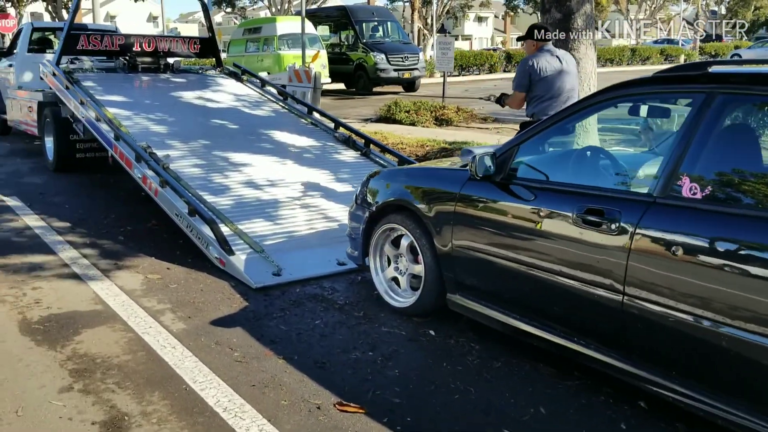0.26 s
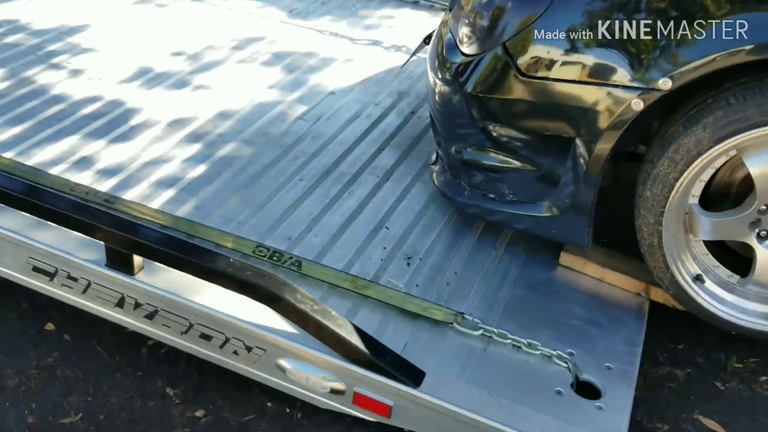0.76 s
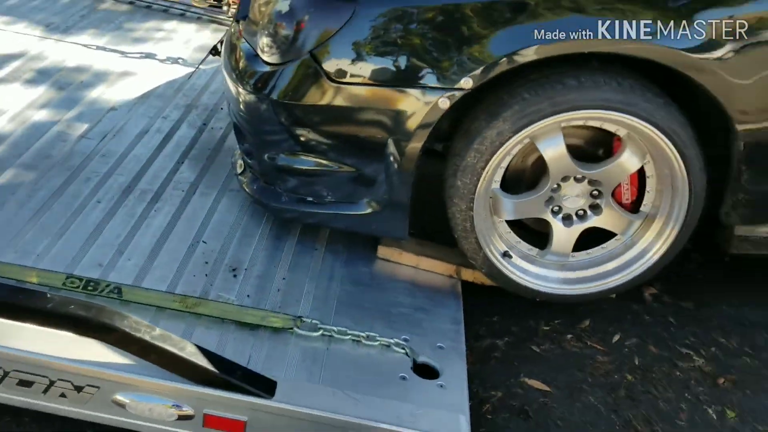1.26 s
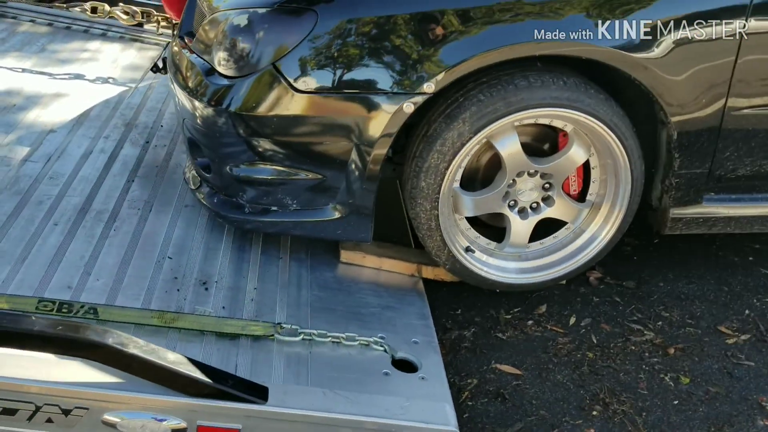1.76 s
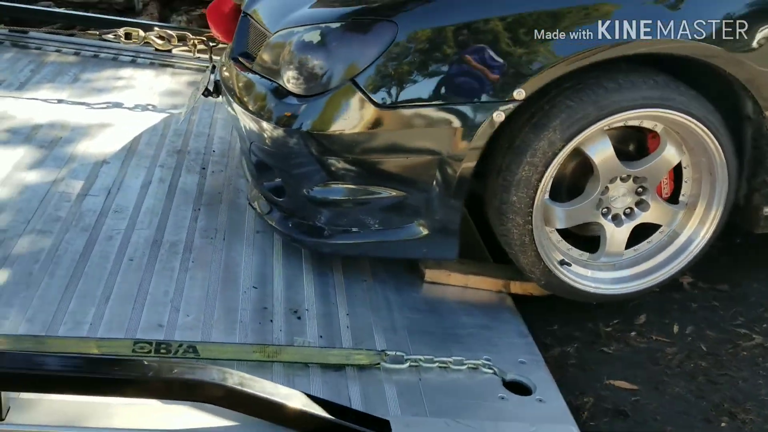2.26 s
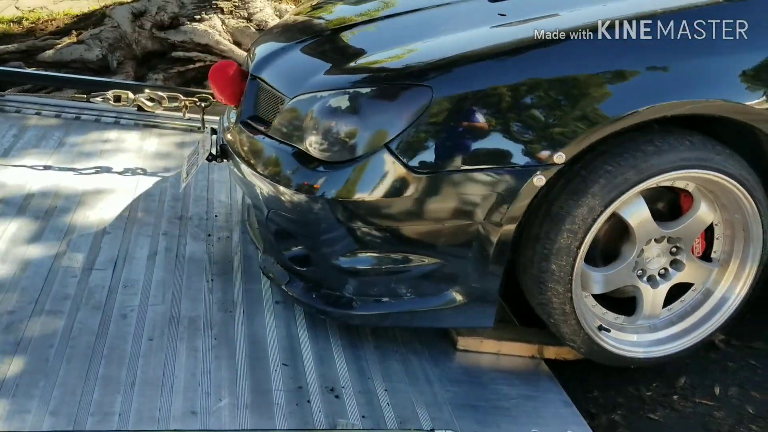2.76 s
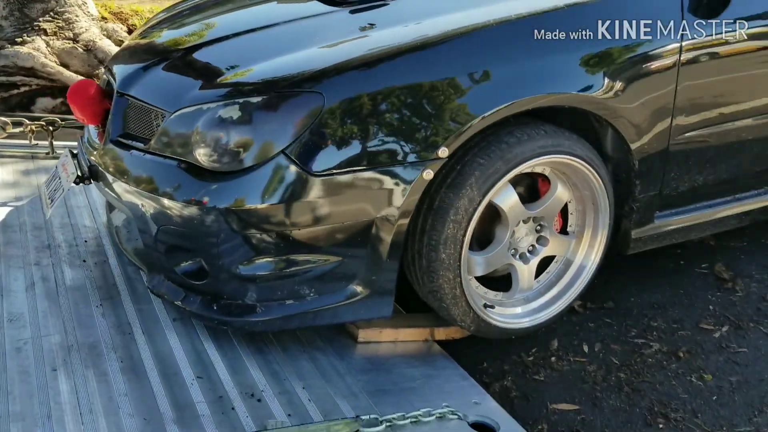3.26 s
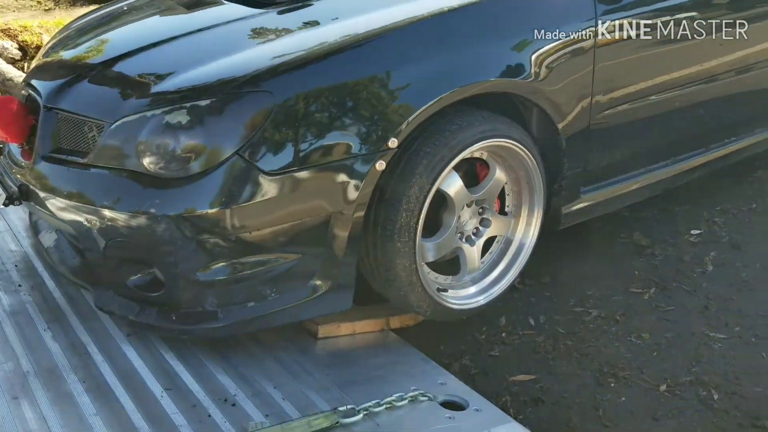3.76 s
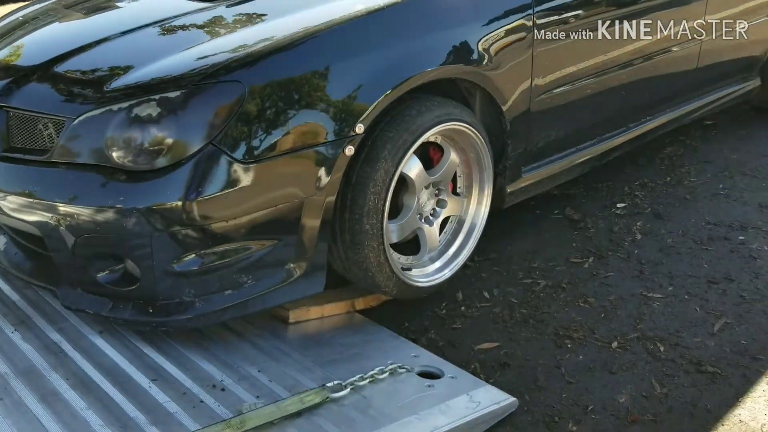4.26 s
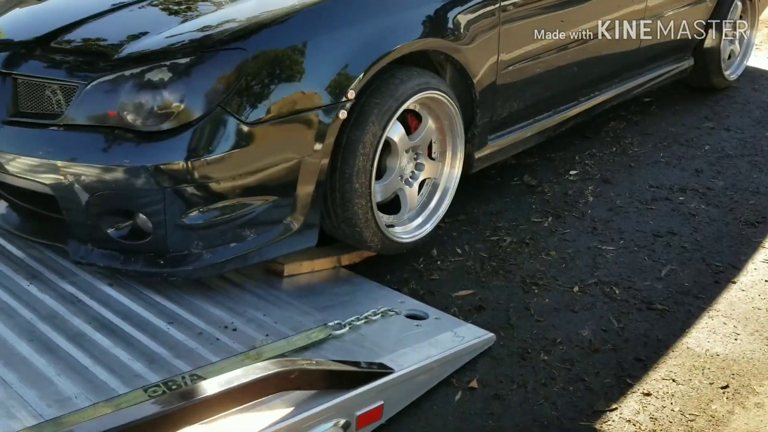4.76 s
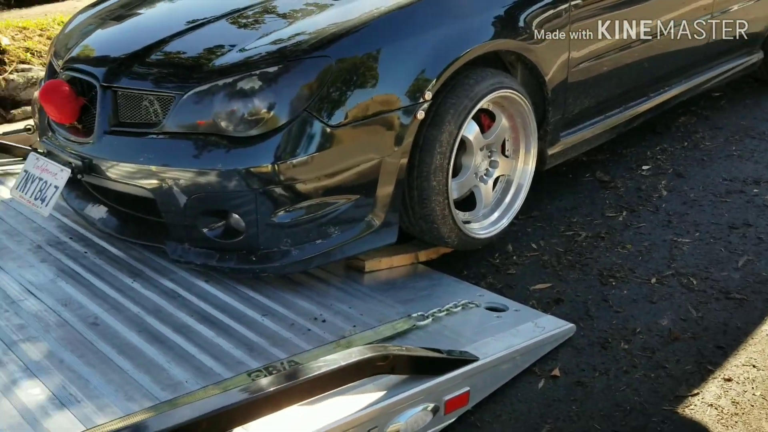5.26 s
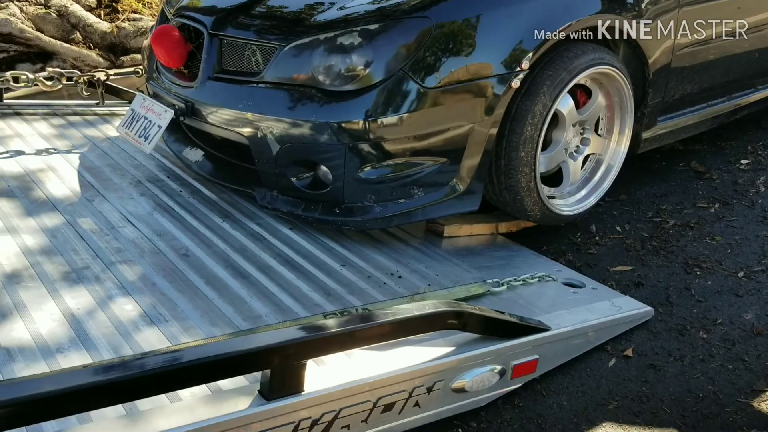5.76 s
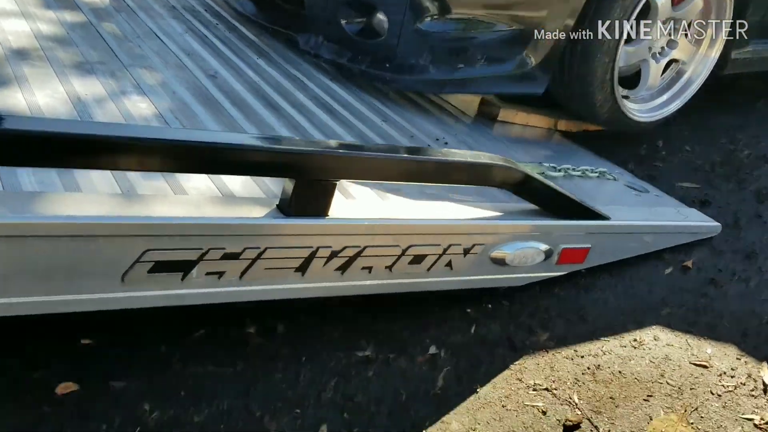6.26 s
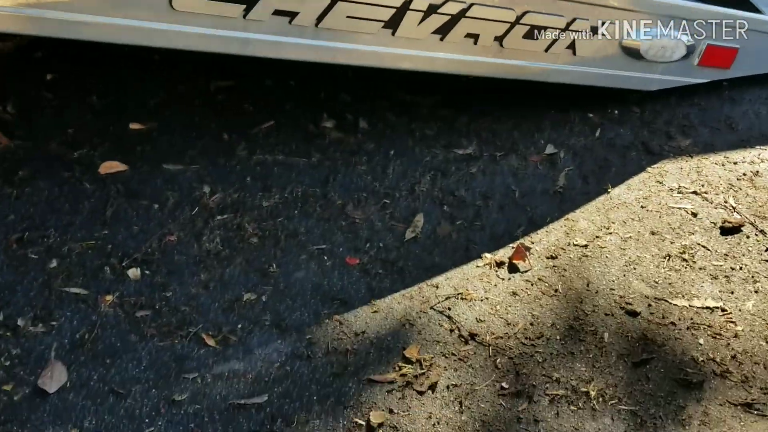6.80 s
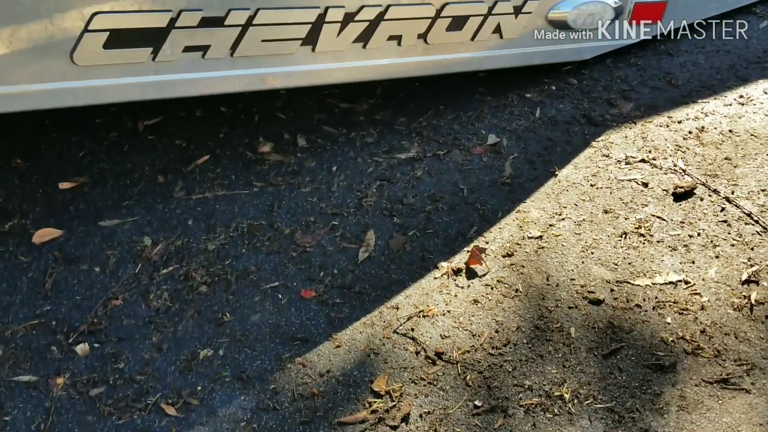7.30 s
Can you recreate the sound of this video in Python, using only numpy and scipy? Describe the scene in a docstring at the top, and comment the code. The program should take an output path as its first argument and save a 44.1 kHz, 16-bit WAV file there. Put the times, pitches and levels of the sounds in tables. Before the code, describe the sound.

A tow truck's diesel idles under a steady winch hum that swells and sinks, with light shoe scuffs and snapping dry leaves.

```python
"""A tow truck rumbles far away, with a scrape of shoes and snapping leaves, and is cut off after 0.57 s.
Then it fades in close by: its diesel runs at fast idle and drives the oil pump of the winch, whose pulses
ring in the steel bed as a whine. The whine swells and sinks as the listener walks round the bed.
Shoes scuff, grit and dry leaves snap. Oil hisses through a valve, loudest from 1.7 to 3.3 s.
Keys chink near 4.5 s and again near 6.2 s."""
import sys
import numpy as np
from scipy import signal
from scipy.fft import rfft, irfft, next_fast_len
from scipy.io import wavfile
from scipy.ndimage import uniform_filter1d, map_coordinates

SR = 44100
rng = np.random.default_rng(int(sys.argv[2]) if len(sys.argv) > 2 else 0)


def digitize_waveform(pressure):
    """Quantize a signal to 16-bit integers and store it at the path in sys.argv[1].

    Rows of a 2-D input are taken as channels; values are limited to [-1, 1].
    """
    field = np.atleast_2d(pressure).T
    bounded = np.clip(field, -1, 1)
    quanta = np.round(bounded * 32767).astype(np.int16)
    wavfile.write(sys.argv[1], SR, quanta)


N = 332205
T = np.arange(N) / SR
FAR_END_S = 0.6  # the far scene gives way to the near one
HISS_SWAY_DB = 0.6

# How the listener turns: (time [s], right ear's delay [ms], whine's left over right [dB])
FACING = [(0, 0.44, 1.5), (1, 0.495, 1.5), (1.7, 0.472, 4), (2.2, 0.466, 2.5), (3.5, 0.412, 4.5),
          (4.5, 0.362, 8.5), (5.5, 0.41, 6), (6.1, 0.433, 6), (7.6, 0.43, 8.5)]


def amp(db):
    """Turn decibels into a gain."""
    return 10 ** (np.asarray(db) / 20)


def unit(x):
    """Scale a signal to an average (rms) strength of 1."""
    return x / np.sqrt(np.mean(x ** 2) + 1e-20)


def sides(db):
    """Left and right gains that make the left louder by db."""
    return amp([db / 2, -db / 2])


def along(points, hz):
    """Read between (frequency, value) points on a musical (log) scale."""
    freqs, values = np.transpose(points)
    return np.interp(np.log(hz + 1), np.log(freqs + 1), values)


def curves(rows):
    """Turn each column after the time into one value per sample."""
    times, *columns = np.transpose(rows)
    return [np.interp(T, times, column) for column in columns]


def wobble(rate):
    """A smooth random curve through rate points a second."""
    coarse = T[::64]
    points = rng.standard_normal(int(N * rate / SR) + 4)
    return np.interp(T, coarse, map_coordinates(points, [coarse * rate]))


def swell_db(start, end, rise_db_s, fall_db_s):
    """A level that climbs to 0 dB at start, holds, and drops after end."""
    return -rise_db_s * np.maximum(start - T, 0) - fall_db_s * np.maximum(T - end, 0)


def shape(spectrum):
    """A tone colour (gain by frequency) from (frequency, level) points."""
    return lambda hz: amp(along(spectrum, hz))


def hump(centre_hz, octaves):
    """A tone colour with one bell-shaped peak."""
    return lambda hz: np.exp(-.5 * (np.log2((hz + 1) / centre_hz) / octaves) ** 2)


def filtered(x, colour):
    """Give a signal a tone colour."""
    n = x.shape[-1]
    size = next_fast_len(n + 4096)
    return irfft(rfft(x, size) * colour(np.fft.rfftfreq(size, 1 / SR)), size)[..., :n]


def lean():
    """Left and right gains that drift the opposite way to the whine."""
    return sides(7 - 0.45 * curves(FACING)[1])


def add(out, start, sound, pan_db):
    """Lay a short sound into the two channels."""
    slot = out[:, round(start * SR):][:, :sound.shape[-1]]
    slot += sound[..., :slot.shape[1]] * sides(pan_db)[:, None]


def rush(colour, patchy_db, count=N, ringing_db=0):
    """Stereo noise, count samples long, with random loud patches and slowly drifting resonances."""
    # How alike the two ears hear it: (frequency [Hz], likeness [0 to 1])
    likeness = [(40, 0.64), (100, 0.8), (300, 1), (700, 0.51), (2000, 0.65), (5000, 0.29), (15000, 0.14)]
    # Which side each pitch favours: (frequency [Hz], left over right [dB])
    balance = [(60, -3), (250, 0.5), (1300, 2), (2400, -3.5), (4400, -5.5), (8000, -1), (15000, -5)]
    # Around 700 Hz the noise reaches the two ears more nearly in step:
    # (frequency [Hz], phase shift [radians])
    ear_phase_shift = [(300, -0.42), (700, -1), (1100, -0.43)]
    grid = signal.stft(rng.standard_normal((2, count)), nperseg=1024)[2]  # ear, frequency, time
    patches = uniform_filter1d(rng.standard_normal(grid.shape[1:]), size=4, axis=0)
    patches = uniform_filter1d(patches, size=10, axis=1)
    resonances = uniform_filter1d(rng.standard_normal(grid.shape[1:]), size=90, axis=1)
    grid *= amp(patchy_db * unit(patches) + ringing_db * unit(resonances))
    pair = signal.istft(grid, nperseg=1024)[1][:, :count]
    size = next_fast_len(count)
    hz = np.fft.rfftfreq(size, 1 / SR)
    spread = np.arccos(np.clip(along(likeness, hz), -1, 1)) / 2
    mid, side = rfft(pair, size) * colour(hz) * [np.cos(spread), np.sin(spread)]
    shift = np.exp(.5j * np.outer([1, -1], along(ear_phase_shift, hz)))
    both = irfft([mid + side, mid - side] * sides(along(balance, hz)) * shift, size)[:, :count]
    return np.pad(unit(both), ((0, 0), (0, N - count))) * lean()


def burst(colour, decay_s, tick=0):
    """A puff of noise that falls 60 dB in decay_s, partly alike in both ears; tick adds a click."""
    t = np.arange(SR // 16) / SR
    envelope = amp(-60 * t / max(decay_s, .002)) * (1 - np.exp(-t / 0.00024))
    puff = envelope * filtered(rng.standard_normal((2, len(t))), colour)
    puff *= np.sqrt(np.sum(envelope ** 2) / np.sum(puff ** 2, axis=1, keepdims=True))
    puff[1] = 0.24 * puff[0] + 1.15 * puff[1]
    click = filtered(signal.unit_impulse(len(t), idx=SR // 1500), colour)
    return puff + tick * click / click.max()


def faint_tones():
    """Thin, unsteady tones come and go."""
    # (start [s], end [s], first pitch [Hz], last pitch [Hz], level [dB])
    tones = [(3.02, 3.35, 326, 322, -45), (3.5, 5.9, 590, 580, -53), (6.5, 7.6, 655, 653, -53),
             (6.5, 7.6, 690, 685, -54), (5.4, 5.95, 118, 148, -41), (3.6, 4.9, 413, 409, -55),
             (3.2, 7.6, 312, 304, -57), (2.8, 4.3, 2545, 2541, -57), (.8, 7.6, 6774, 6774, -76),
             (1.8, 3.4, 1165, 1165, -59), (1.9, 3.7, 2050, 2058, -61), (.3, .44, 828, 828, -43)]
    out = np.zeros(N)
    for start, end, first_hz, last_hz, db in tones:
        on = (T > start) & (T < end)
        fade = np.clip(np.minimum(T[on] - start, end - T[on]) / 0.045, 0, 1)
        hz = np.interp(T[on], (start, end), (first_hz, last_hz))
        phase = 2 * np.pi * np.cumsum(hz) / SR + 0.041 * np.sqrt(first_hz) * wobble(18)[on]
        out[on] += amp(db + 1.2 * wobble(11)[on]) * fade * np.sin(phase)
    return np.sqrt(2) * out * lean()


def far_engine():
    """From far off the engine is only a rumble that swells once and an even rush."""
    # Colour of the far rumble: (frequency [Hz], level [dB])
    rumble_colour = [(12, -67), (20, -40), (32, -29), (49, 2.5), (81, -2), (176, 0), (384, -11), (550, -22),
                     (720, -59), (1210, -120)]
    # Colour of the rush above it: (frequency [Hz], level [dB])
    rush_colour = [(240, -39), (400, -27), (528, -19), (645, -20), (826, -25), (1110, -10), (1250, -13),
                   (1390, -4.5), (1560, -15), (2300, -16), (2680, -14), (3070, -16), (7510, -33),
                   (9920, -34), (16000, -39)]
    rumble_db = -31.5 + swell_db(0.35, 0.35, rise_db_s=23, fall_db_s=27) + 0.72 * wobble(59.2)
    rumble = amp(rumble_db) * rush(shape(rumble_colour), patchy_db=1.9, count=SR)
    return rumble + amp(-44) * rush(shape(rush_colour), patchy_db=2.5, count=SR)


def shoes():
    """Soles make one hollow scrape, crack grit and drag over the ground."""
    # Colour of the scrape: (frequency [Hz], level [dB])
    scrape_colour = [(520, -38), (630, -1.5), (700, 0), (750, -5), (830, 1), (950, -5.5), (1080, -33.5)]
    # Grit cracking under a sole: (time [s], level [dB], pitch [Hz])
    cracks = [(1.468, -42, 684), (1.485, -33, 773), (1.524, -44, 900), (1.553, -45, 750), (1.584, -39, 845),
              (1.604, -41, 696), (1.638, -48, 700), (1.649, -32, 700), (3.63, -33, 700.2),
              (3.656, -39, 900), (3.681, -33, 497), (4.5685, -20.5, 2050), (4.832, -33, 885),
              (6.091, -40, 1420), (6.1227, -40, 2660), (6.247, -35, 2700), (6.262, -30.5, 1800)]
    # Scuffs, rustles and thuds: (time [s], length [s], level [dB], pitch [Hz], width [octaves])
    scuffs = [(1.464, .22, -38, 605, 0.77), (3.598, 0.11, -39, 880, 1.37), (3.623, 0.04, -47, 4260, 0.17),
              (4.511, 0.14, -41.5, 1460, 1.58), (4.564, 0.1, -40.5, 790, 0.91),
              (4.771, 0.025, -38, 1100, 0.92), (4.811, 0.037, -35.5, 700, 1.24),
              (4.812, 0.12, -39, 1280, 0.98), (5.807, 0.055, -41.5, 1390, 0.6),
              (6.051, 0.23, -43.5, 1890, 1.22), (6.123, 0.095, -42, 13200, 0.25),
              (6.215, 0.13, -45.5, 13600, 0.59), (6.985, 0.061, -33, 107, 0.18),
              (7.028, 0.05, -34, 60, 0.38), (7.076, 0.11, -49.5, 9000, 1.3), (0.544, 0.034, -32, 129, 1.05)]
    scrape_db = -39 + swell_db(0.13, 0.36, rise_db_s=88, fall_db_s=61) + 0.59 * wobble(61.6)
    out = amp(scrape_db) * rush(shape(scrape_colour), patchy_db=4, count=SR) * (T < FAR_END_S)
    for start, db, hz in cracks:
        add(out, start, amp(db) * burst(hump(hz, octaves=.6), decay_s=15 / hz, tick=2.2), pan_db=4)
    for start, length, db, hz, octaves in scuffs:
        n = round(length * SR)
        grit = rng.standard_normal((2, n))
        grit *= amp(2.5 * unit(uniform_filter1d(rng.standard_normal(n), size=130)))  # grainy loudness
        grit[1] = 0.43 * grit[0] + 0.63 * grit[1]
        scuff = np.hanning(n) ** 0.48 * unit(filtered(grit, hump(hz, octaves)))
        add(out, start, amp(db) * scuff, pan_db=3)
    return out


def leaves():
    """Dry leaves snap close by, each a click and a puff in three pitch bands."""
    # (time [s], low band [dB], middle band [dB], high band [dB], decay [s], left over right [dB])
    snaps = [(0.345, -31, -37.5, -46, 0.013, 8.5), (0.3502, -43, -38, -40, 0.01, 9),
             (0.409, -38, -21.5, -25.5, 0.0065, 9.5), (0.4122, -35, -46, -34.5, 0.018, 14),
             (0.4224, -50, -42, -52, 0.013, 6), (1.524, -41, -41, -35.5, .014, 2),
             (1.793, -46, -35, -29, 0.024, 3), (1.881, -45, -28.5, -28.5, 0.012, 3),
             (2.041, -34, -33, -31.5, 0.025, 4), (3.633, -36.5, -48, -46, 0.027, 14),
             (3.68, -45, -46, -40, .012, 6), (3.7454, -59, -52, -36, .014, -1),
             (4.402, -35, -35, -31.5, 0.018, 4), (4.4187, -55, -37, -34, 0.016, 2),
             (4.4495, -50, -46, -35, .008, 3), (4.5225, -30, -35, -53, 0.02, 3),
             (4.5347, -25.5, -41, -46, 0.0097, 11), (4.544, -31, -40.5, -47, 0.023, 19),
             (4.5512, -28, -42, -43, 0.022, 8), (4.568, -39, -37, -36, 0.017, 15),
             (4.576, -33, -45, -40, .022, 12), (4.833, -37, -46, -48, 0.025, 11),
             (6.1328, -33, -41, -32, 0.031, 5), (6.1517, -44, -39, -31, 0.029, 1),
             (6.263, -33, -46, -44, 0.014, 3), (6.4617, -33.5, -38, -31.5, 0.017, 6)]
    # The low, middle and high band: (centre [Hz], width [octaves])
    bands = [(2300, 0.51), (5300, 0.54), (12460, 0.3)]
    out = np.zeros((2, N))
    for start, *levels, decay_s, pan_db in snaps:
        snap = sum(amp(db) * burst(hump(*band), decay_s, tick=1) for db, band in zip(levels, bands))
        add(out, start, snap, pan_db)
    return out


def keys():
    """Keys meet with a crack, then ring in two clusters of notes so close they sound like noise."""
    # (time [s], low ring [dB], low ring's pitch [Hz], high ring [dB], left over right [dB])
    chinks = [(4.406, -41, 11800, -40, 4), (4.5999, -39.5, 10870, -41, 11), (4.6083, -49, 10800, -48, 0),
              (4.6763, -49, 11730, -41, 7), (6.231, -29.5, 11650, -28, 3), (6.2427, -38, 11830, -32, 2.5),
              (6.2497, -37, 11700, -32, 3), (6.2696, -35, 11700, -36, 4), (6.2874, -50, 11900, -45, -5),
              (6.302, -43, 11800, -41, -3)]
    # The low and the high ring: (decay [s], width [Hz])
    rings = [(0.061, 110), (.04, 500)]
    high_hz = 14900
    out = np.zeros((2, N))
    for start, low_db, low_hz, high_db, pan_db in chinks:
        for hz, db, (decay_s, width_hz) in zip((low_hz, high_hz), (low_db, high_db), rings):
            add(out, start, amp(db) * burst(hump(hz, width_hz / hz), decay_s), pan_db)
        crack = amp(low_db + 4) * burst(hump(12000, octaves=0.29), decay_s=0.017)
        add(out, start, crack, pan_db)
    return out


def exhaust():
    """The diesel's firings make a low hum and its octave, which waver as no two firings are alike."""
    # Loudness of the hum: (time [s], level [dB])
    hum_levels = [(0.9, -44.5), (3.08, -42.5), (6.38, -42.5), (7.0, -53), (7.53, -42)]
    firing_hz, equal_db = 59.3, -43.5
    hum_db = curves(hum_levels)[0]
    octave_db = equal_db + 1.9 * (hum_db - equal_db)  # the octave swings further than the hum
    flutter = lambda: np.array([wobble(12), wobble(11)])  # moving air, different at each ear
    out = np.zeros((2, N))
    for harmonic, db in (1, hum_db), (2, octave_db):
        gain = amp(db + 0.54 * wobble(9) + 0.44 * flutter())
        phase = 2 * np.pi * harmonic * firing_hz * T + 0.71 * wobble(9) + 0.18 * flutter()
        out += gain * np.sin(phase)
    return np.sqrt(2) * out * sides(2.5)[:, None]


def engine_block():
    """The block rumbles, clatters and hisses; the bodywork's resonances drift as the listener walks."""
    # How loud the block reaches the listener: (time [s], level [dB])
    block_levels = [(1.0, -47.5), (1.18, -46.5), (1.67, -44), (2.22, -43), (5.31, -43), (5.71, -41),
                    (6.02, -41), (6.89, -47.5), (7.53, -45.5)]
    # How rumble, clatter and hiss follow that level: (offset [dB], swing [dB per dB])
    layers = [(5, 0.48), (4, 0.88), (-4.5, 1.07)]
    # Colour of the rumble: (frequency [Hz], level [dB])
    rumble_colour = [(12, -54), (20, -12), (49, 1.5), (108, 4.5), (197, -1), (248, -3), (273, -7),
                     (296, -7), (367, -23.5), (500, -47), (650, -60), (1100, -120)]
    # Colour of the clatter beside the bed: (frequency [Hz], level [dB])
    beside_colour = [(180, -33), (300, -8), (336, -5), (412, -11), (488, -10), (566, -12), (726, -8),
                     (986, -15.5), (1200, -6), (1590, -14), (2470, -12.5), (3200, -16.5), (4500, -23),
                     (5850, -59), (9900, -120)]
    # Colour of the clatter behind the bed: (frequency [Hz], level [dB])
    behind_colour = [(180, -31), (300, -9.5), (467, -6), (505, -14.5), (541, -7.5), (671, -5.5), (718, -13),
                     (743, -12.5), (1000, -11.5), (1230, -6.5), (1420, -5.5), (1520, -11), (2300, -13),
                     (2760, -9.5), (3150, -15.5), (3800, -18.5), (4500, -16.5), (5850, -30.5), (9900, -120)]
    # Colour of the hiss: (frequency [Hz], level [dB])
    hiss_colour = [(2060, -23), (3500, 1.5), (4100, -6.5), (4510, -2.5), (5190, -1.5), (5970, -3.5),
                   (6800, -6), (8580, -11), (13200, -7), (15600, -12), (16000, -21)]
    block_db = curves(block_levels)[0]
    mean_db = block_db.mean()
    rumble_db, clatter_db, hiss_db = [mean_db + db + swing * (block_db - mean_db) for db, swing in layers]
    sway = wobble(7.4)
    walked = np.clip((T - 2.827) / 0.92, 0, 1)  # 0 beside the bed, 1 behind it
    beside = np.sqrt(1 - walked) * rush(shape(beside_colour), patchy_db=1, ringing_db=1.16)
    behind = np.sqrt(walked) * rush(shape(behind_colour), patchy_db=1.5, ringing_db=1.16)
    clatter = amp(clatter_db + 0.082 * sway) * (beside + behind)
    rumble = amp(rumble_db + wobble(4.71)) * rush(shape(rumble_colour), patchy_db=-1)
    hiss_db += 4 * np.clip((1 - T) / .4, 0, 1)  # the hiss stands out during the fade-in
    hiss_db += HISS_SWAY_DB * (sway + wobble(22))
    return rumble + clatter + amp(hiss_db) * rush(shape(hiss_colour), patchy_db=1)


def oil_valve():
    """Oil hisses while it is squeezed through the valve."""
    # Peaks in the hiss: (centre [Hz], width [Hz], level [dB])
    peaks = [(4250, 500, -1.5), (6040, 670, -2), (7300, 790, -3.5), (10700, 900, -9), (12400, 900, -4.5),
             (14800, 1600, -1)]
    colour = lambda hz: sum(amp(db) / (1 + ((hz - mid) / (width / 2)) ** 2) for mid, width, db in peaks)
    hiss_db = -48 + swell_db(1.7, 3.3, rise_db_s=16, fall_db_s=136) + HISS_SWAY_DB * wobble(11)
    return amp(hiss_db) * rush(colour, patchy_db=1)


def pump():
    """The pump's pressure pulses ring in the steel bed as an almost pure whine."""
    # The whine's main tone: (time [s], pulse rate [Hz], level [dB])
    whine = [(0.7, 254.5, -34), (0.89, 252.9, -34.5), (1.25, 251, -39.5), (1.63, 248.4, -27.5),
             (2.92, 247.8, -30), (3.42, 249.5, -34.5), (3.61, 253, -40.5), (3.86, 253.3, -34.5),
             (4.28, 255.1, -38.5), (4.43, 255.6, -47.5), (4.46, 258.8, -55.5), (4.75, 254.2, -35),
             (5.45, 252.6, -26), (6.2, 253.2, -26.5), (6.69, 252.5, -42), (7.09, 252.5, -47),
             (7.49, 249.8, -38), (7.53, 251, -41)]
    # The overtone an octave above it: (time [s], level [dB])
    octave_levels = [(1.0, -59.5), (1.69, -50), (3.33, -55), (3.9, -56), (5.62, -45), (7.18, -61),
                     (7.53, -54)]
    hz, db = curves(whine)
    phase = 2 * np.pi * np.cumsum(hz) / SR + 0.05 * wobble(30)
    tone = amp(db + 0.39 * wobble(16)) * np.sin(phase)
    overtones = np.sin(2 * phase) + amp(-8) * np.sin(3 * phase)
    tone += amp(curves(octave_levels)[0] + 1.9 * wobble(9.9)) * overtones
    return np.sqrt(2) * tone * sides(curves(FACING)[1])


def scene():
    """The truck far off, then close by; the right ear hears what lies to the left a little late."""
    far = far_engine()
    near = pump() + oil_valve() + exhaust() + engine_block()
    sound = np.where(T < FAR_END_S, far, near) + faint_tones() + leaves() + keys()
    delay_samples = curves(FACING)[0] * SR / 1000
    sound[1] = map_coordinates(sound[1], [np.arange(N) - delay_samples], order=3)
    return sound + shoes()  # the shoes reach both ears at once, a little louder on the left


def record(dry):
    """Cut off the far scene, fade in the near one and remove the highest treble."""
    cut_s, fade_start_s, floor_db, top_hz = .574, .616, -60, 15650
    cut = np.exp(-np.maximum(T - cut_s, 0) / .0015)
    fade = (1 - np.exp(-np.maximum(T - fade_start_s, 0) / .15)) ** 2.03
    return filtered(dry * np.maximum(cut + fade, amp(floor_db)), lambda hz: hz < top_hz)


dry = scene()
out = record(dry)
digitize_waveform(out)
```